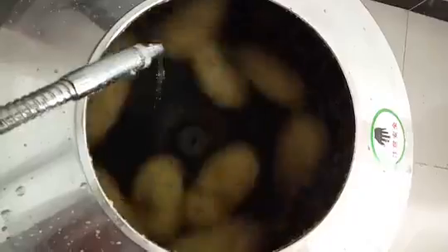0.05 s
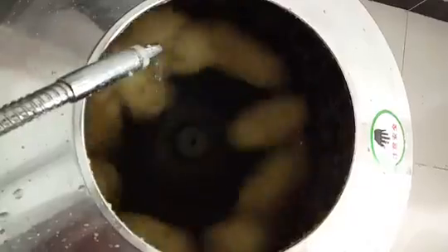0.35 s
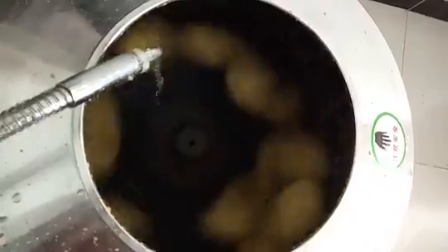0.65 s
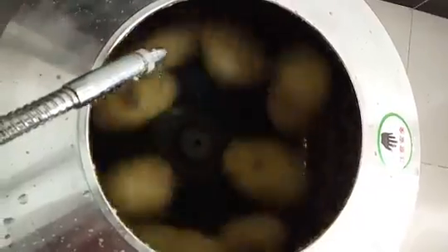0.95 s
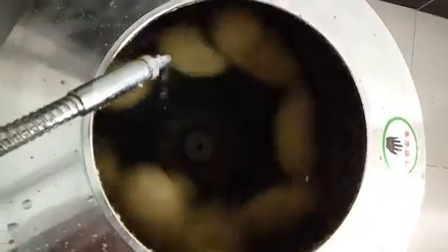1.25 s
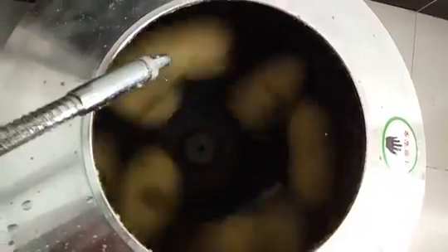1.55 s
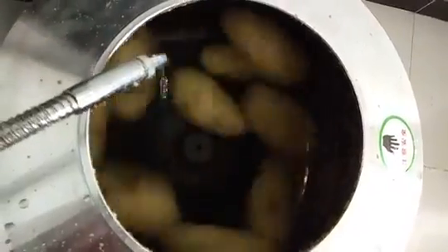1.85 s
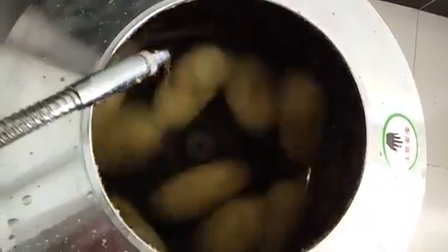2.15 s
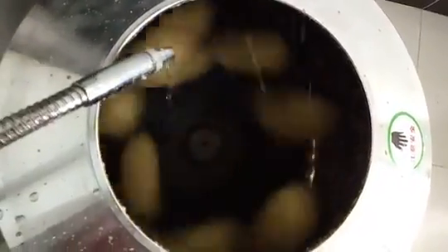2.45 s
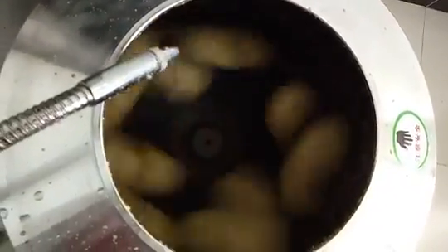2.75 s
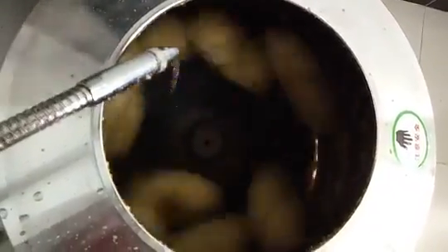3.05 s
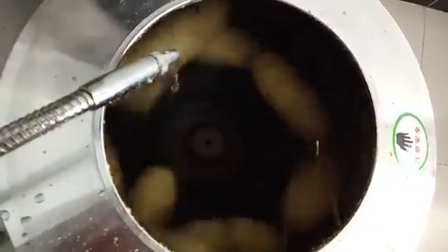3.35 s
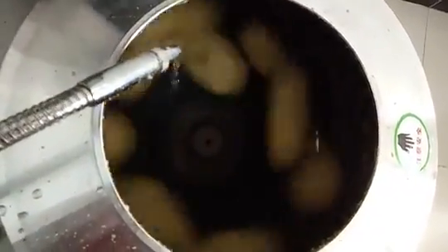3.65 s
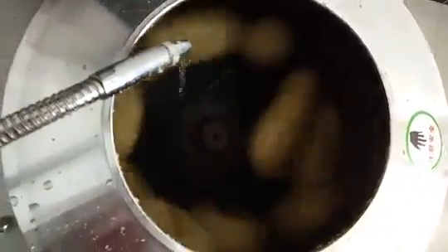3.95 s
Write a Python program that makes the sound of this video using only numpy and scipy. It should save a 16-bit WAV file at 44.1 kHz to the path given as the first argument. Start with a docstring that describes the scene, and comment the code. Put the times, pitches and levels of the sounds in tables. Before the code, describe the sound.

A potato peeling machine is heard close up from the start, running for about four seconds. Tumbling potatoes keep the steel drum booming and knock irregularly against its wall, several times a second, with brief rattles and brighter metallic glances near 0.3, 1.3, 2.5 and 3.9 seconds. Wet skins rasp on the gritty lining over a low motor hum and faint water spray. Everything is louder on the right.

```python
"""At a running potato peeling machine, a stereo microphone just above its open steel drum.
The spinning disc throws potatoes about: their soft thuds keep the drum booming, harder hits knock,
rattle and glance on the wall and rim, and the abrasive lining rasps their wet skins.
Water sprays in and the motor hums underneath. Everything is louder on the right."""
import sys
import numpy as np
from scipy import signal
from scipy.fft import rfft, irfft
from scipy.io import wavfile

SR = 44100
rng = np.random.default_rng(int(sys.argv[2]) if len(sys.argv) > 2 else 0)


def store_wav(level_fs):
    """Save 16-bit WAV to argv[1]."""
    pcm = np.round(np.clip(np.atleast_2d(level_fs), -1, 1) * 32767)
    wavfile.write(sys.argv[1], SR, pcm.T.astype(np.int16))


N = 176400
TIME, FREQ = np.arange(N) / SR, np.maximum(np.arange(N // 2 + 1) * SR / N, 1)


def from_db(db):
    """Decibels to gain."""
    return 10 ** (np.asarray(db) / 20)


def unit_rms(x):
    """Scale to rms 1."""
    return x / np.sqrt(np.mean(x ** 2) + 1e-20)


def per_hz(points):
    """Read a table along log frequency."""
    hz, value = np.transpose(points)
    return np.interp(np.log(FREQ), np.log(hz), value)


def shape(x, gain):
    """Filter by a gain per frequency."""
    return irfft(rfft(x) * gain, N)


def above(hz, order=4):
    """Gain of a high-pass."""
    return 1 / np.sqrt(1 + (hz / FREQ) ** (2 * order))


def below(hz, order):
    """Gain of a low-pass, 6 dB down at hz."""
    return 1 - above(hz, order) ** 2


def drift(rate_hz):
    """Slow random wander with rms 1."""
    return unit_rms(shape(rng.standard_normal(N), below(rate_hz, order=1)))


def clicks(per_s, spread_db):
    """Random contacts of uneven size."""
    size = from_db(spread_db * np.minimum(rng.exponential(1, N), 4))
    return (rng.random(N) < per_s / SR) * size * rng.choice([-1, 1], N)


def strikes(times, db):
    """One click per event."""
    out = np.zeros(N)
    np.add.at(out, np.clip(np.int64(times * SR), 0, N - 1), from_db(db))
    return out


def resonate(x, modes):
    """Parallel resonances (f/Hz, width/Hz, level/dB) with alternating signs."""
    out = 0
    for k, (hz, width, db) in enumerate(modes):
        r = np.exp(-np.pi * width / SR)
        ring = signal.lfilter([1, 0, -1], [1, -2 * r * np.cos(2 * np.pi * hz / SR), r * r], x + 1e-18)
        out = out + (-1) ** k * from_db(db) * (1 - r * r) / 2 * ring
    return out


def fade(x, seconds):
    """Give every click an exponential tail."""
    return signal.lfilter([1], [1, -np.exp(-1 / (seconds * SR))], x + 1e-18)


def scatter(x, seconds):
    """Reflections inside the drum smear each click, differently for each side."""
    return np.sqrt(fade(x ** 2, seconds / 2)) * rng.standard_normal((2, N))


# How alike the two sides of the microphone are: f/Hz, likeness/0-1
LIKENESS = [(25,0.97),(130,0.59),(280,0.46),(500,0.79),(750,0.33),(1200,0.11)]
def blend(pair):
    """Make two unrelated signals alike in the bass and leave them apart in the treble."""
    alike = np.sqrt(np.clip(per_hz(LIKENESS), 0, 1)) * below(880, order=2)
    mid = shape(pair[0], np.sqrt((1 + alike) / 2))
    side = shape(pair[1], np.sqrt((1 - alike) / 2))
    return mid + side * [[1], [-1]]


# Low resonances of the drum below the microphone: f/Hz, width/Hz, level/dB (relative, in all tables)
DRUM_MODES = [(107.3, 22, -5.5), (137.4, 6.7, -2), (153.5, 14.6, -6), (170.6, 18.8, -4.5), (202.2, 21, -10)]
# A heavy potato lands on the disc: t/s, level/dB
LANDINGS = [(0.093,-0.5),(0.378,2.5),(0.967,-11),(1.157,1.5),(1.301,4.5),(1.567,2),(1.61,0),(1.99,4.5),(2.147,5),(2.781,2),(3.049,0),(3.437,3.5)]
def boom():
    """Soft thuds keep the drum's low resonances ringing; a heavy landing sets them all off at once."""
    times, db = np.transpose(LANDINGS)
    softness = above(128) * below(277, order=2)
    thuds = shape(clicks(per_s=290, spread_db=.5), softness)
    landings = shape(strikes(times, db + 6.5), softness)
    ring = resonate(thuds, DRUM_MODES) + sum(resonate(landings, [mode]) for mode in DRUM_MODES)
    return from_db(-23) * unit_rms(ring)


# Motor hum from underneath: multiple of the shaft rate, level/dB
HUM_HARMONICS = [(5, -31), (6, -24.5), (7, -29)]
# Spectrum of the shaking housing: f/Hz, level/dB
HOUSING_RUMBLE = [(21,4.5),(52,-16.5),(76,-5),(160,3),(420,-4),(850,-12),(2000,-20.5)]
def motor(shaft_hz=24.12):
    """A hum on multiples of the shaft rate wavers with the load, over the rumble of the housing."""
    turns = np.cumsum(shaft_hz * (1 + 0.0122 * drift(3.83))) / SR
    hum = 0
    for multiple, db in HUM_HARMONICS:
        amplitude = np.sqrt(2) * from_db(db + 2.5 * drift(26))
        hum = hum + amplitude * np.sin(2 * np.pi * multiple * turns + .5 * drift(2.8))
    colour = from_db(per_hz(HOUSING_RUMBLE)) * above(23) * below(1640, order=4)
    rumble = shape(blend(rng.standard_normal((2, N))), colour)
    return hum + from_db(-27.5) * unit_rms(rumble)


# Spectrum of wet grit and water at close range: f/Hz, level/dB
WET_GRIT = [(1500,-2),(1950,-3.5),(2330,-1),(3150,-3),(4260,-1),(4640,2.5),(5080,.3),(5750,-9),(6200,-6.5),(7630,-18),(8800,-9),(14200,-7)]
def wet_hiss(x):
    """Give a signal the bright colour of the wet lining, at rms 1."""
    return unit_rms(shape(x, from_db(per_hz(WET_GRIT)) * above(930, order=3)))


def spray():
    """Water sprays into the drum with an even hiss."""
    return from_db(-40) * wet_hiss(rng.standard_normal((2, N)))


def spatter(q=65):
    """Droplets burst, each ringing briefly at a pitch of its own."""
    pitches = np.geomspace(2000, 13000, 24)
    drops = clicks(per_s=1600, spread_db=2) * rng.standard_normal((2, N))
    choice = rng.integers(0, len(pitches), N)
    return sum(resonate(drops * (choice == k), [(hz, hz / q, 0)]) for k, hz in enumerate(pitches))


def squeaks(width_hz=60):
    """Wet skin slips on the steel in tiny squeaks, each at a pitch of its own."""
    pitches = np.geomspace(4400, 5140, 6)
    slips = clicks(per_s=90, spread_db=4.5)
    choice = rng.integers(0, len(pitches), N)
    return sum(resonate(scatter(slips * (choice == k), seconds=.008), [(hz, width_hz, 0)])
               for k, hz in enumerate(pitches))


# For a moment the potatoes fly clear of the wall: t/s
LULLS = [0.178, 0.448, 1.185, 1.518, 1.6, 1.812, 1.879, 1.963, 2.388, 2.599, 3.05]
def wall_contact(dip_db=-4.5, half_width_s=0.016):
    """Gain of the grinding and light bumps, which sinks in each lull."""
    return from_db(dip_db * sum(np.exp(-((TIME - t) / half_width_s) ** 2) for t in LULLS))


# Continuous grinding on the lining: t/s, level/dB
GRINDING = [(0.1,-28.5),(0.6,-27.5),(0.95,-30.5),(1.06,-29),(1.24,-29.5),(1.45,-27.5),(2.3,-27),(3.02,-28.5),(3.45,-26.5),(4.0,-26)]
# A wet potato is torn along the lining: t/s, level/dB, release/s
SCRAPES = [(0.255,-33,0.025),(0.366,-23,0.032),(0.421,-19.5,0.014),(0.492,-20.5,0.041),(0.633,-27,0.035),(0.70,-19,0.022),(0.854,-18,0.012),(1.019,-21.5,0.024),(1.08,-22,0.063),(1.143,-14,0.0071),(1.416,-22,0.032),(1.48,-19,0.01),(1.545,-21.5,0.051),(1.618,-17,0.011),(1.698,-27,0.05),(1.836,-22.5,0.054),(1.93,-19.5,0.0062),(2.036,-18,0.013),(2.232,-19.5,0.0092),(2.352,-21,0.028),(2.483,-7,0.0045),(2.519,-11.5,0.01),(2.614,-21,0.072),(2.731,-21.5,0.018),(2.754,-17,0.01),(2.884,-20,0.032),(2.961,-12,0.0079),(3.099,-23.5,0.054),(3.178,-22,0.016),(3.268,-13.5,0.0065),(3.55,-45,0.014),(3.725,-25,0.012),(3.86,-19,0.019)]
def rasp(attack_s=0.0031):
    """Grit tears at the wet skins in tiny snaps, swelling whenever a potato drags or slaps the wall."""
    grinding_db = np.interp(TIME, *np.transpose(GRINDING)) - 2.5 + 1.93 * drift(20)
    power = (wall_contact() * from_db(grinding_db)) ** 2 + slap_power()
    for t, db, release_s in SCRAPES:
        age = np.clip(TIME - t, 0, 1)
        scrape = from_db(db - 3.5) * (1 - np.exp(-age / attack_s)) * np.exp(-age / release_s)
        power = power + scrape ** 2
    snaps = wet_hiss(scatter(clicks(per_s=13000, spread_db=2.5), seconds=0.0019))
    drops = from_db(-8) * wet_hiss(spatter())
    slips = from_db(-12.5) * unit_rms(squeaks())
    return np.sqrt(power) * (snaps + drops + slips)


# Resonances of the steel wall: f/Hz, width/Hz, level/dB
WALL_MODES = [(280, 142, -4), (529.7, 17.4, 3), (675.8, 59, 2), (752, 66, 1), (786, 100, -2),
              (889.3, 46, -5.5), (1114.6, 31, -11), (1203, 31, -14.5)]
# Bright resonances of the rim, close to the microphone: f/Hz, width/Hz, level/dB
RIM_MODES = [(1106, 120, 2.5), (1377, 102, 4.5), (1670, 210, -3.5), (2176, 90, 2), (2386, 80, 3.5),
             (2900, 790, -9)]
# A potato hits the wall: t/s, knock level/dB, clack level/dB
WALL_HITS = [(0.123,-20,-26.5),(0.53,-11,-29),(0.636,-17,-49),(0.707,-26,-33),(0.743,-16,-27.5),(0.804,-14,-28),(0.86,-14.5,-32),(0.929,-18.5,-25.5),(1.039,-13.5,-42),(1.144,-15.5,-35),(1.209,-14,-33),(1.232,-29,-24),(1.254,-23,-36),(1.283,-19,-38),(1.305,-15,-30),(1.398,-19,-28),(1.477,-16.5,-33),(1.544,-12,-27),(1.621,-19,-28.5),(1.652,-23,-40),(1.774,-17.5,-48),(1.912,-18.5,-32),(2.014,-16,-29),(2.244,-18.5,-50),(2.404,-14,-26.5),(2.463,-14,-27),(2.728,-22,-29),(2.814,-13,-34),(2.861,-16,-28),(2.963,-13.5,-33),(3.118,-14,-39),(3.289,-15.5,-26.5),(3.345,-20,-37),(3.406,-17,-29),(3.531,-17.5,-26.5),(3.65,-15.5,-29),(3.718,-13,-30),(3.892,-17,-33),(3.925,-15.5,-28)]
def knocks(spot_spread_db=1):
    """Hard hits ring the wall and rim and chatter briefly; the wall's ring varies with the spot hit."""
    times, knock_db, clack_db = np.transpose(WALL_HITS)
    wall_db, rim_db = knock_db + 36, clack_db + 13
    spot_db = spot_spread_db * rng.standard_normal((len(times), len(WALL_MODES)))
    ring = sum((-1) ** k * resonate(strikes(times, wall_db + spot_db[:, k]), [mode])
               for k, mode in enumerate(WALL_MODES))
    chatter = 0.046 * blend(scatter(strikes(times, wall_db), seconds=0.009))
    clacks = blend(scatter(strikes(times, rim_db), seconds=0.024))
    return ring + resonate(chatter, WALL_MODES) + resonate(clacks, RIM_MODES)


def slap_power(decay_s=0.003):
    """Wet skin slaps at each hard hit, adding a short burst of power to the rasp."""
    times, knock_db, _ = np.transpose(WALL_HITS)
    return fade(strikes(times, knock_db - 13) ** 2, decay_s / 2)


def bumps():
    """Lighter hits on the wall fill the gaps between the knocks."""
    hits = clicks(per_s=340, spread_db=2)
    reflections = .12 * blend(scatter(hits, seconds=0.001))
    return from_db(-29) * wall_contact() * unit_rms(resonate(hits + reflections, WALL_MODES))


# A potato rattles along the wall: t/s, length/s, level/dB
RATTLES = [(0.24,.12,-27.5),(0.823,0.073,-27),(2.425,0.077,-35),(2.692,0.13,-27.5),(3.066,0.094,-27.5),(3.852,0.084,-37)]
# Hollow ring of the rattled wall: f/Hz, width/Hz, level/dB
RATTLE_MODES = [(905.5, 15, 14.5), (1263, 104, -1), (2233, 87, -3.5)]
def rattles():
    """A quick run of small contacts swells and fades, ringing the wall at a hollow pitch."""
    swell = sum(from_db(db) * np.sin(np.pi * np.clip((TIME - t) / length, 0, 1))
                for t, length, db in RATTLES)
    contacts = blend(scatter(clicks(per_s=670, spread_db=1.5), seconds=0.00055))
    return swell * unit_rms(resonate(contacts, RATTLE_MODES))


# A glancing hit sets the rim singing: t/s, level/dB, f/Hz
GLANCES = [(0.314, -18, 2200), (0.4599, -24.5, 2400), (1.283, -21, 2350), (2.4555, -22, 2400),
           (3.1153, -25, 2400), (3.272, -24, 2400), (3.894, -16, 2245)]
def glances(width_hz=91):
    """Each hit skids briefly, clattering on the whole rim and favouring a pitch set by the spot."""
    out = 0
    for t, db, hz in GLANCES:
        skid = scatter(strikes(t, db + 7), seconds=0.023)
        out = out + resonate(skid, [(hz, width_hz, 10)]) + from_db(-6) * resonate(skid, RIM_MODES)
    return out


# Balance at the microphone: f/Hz, left minus right level/dB
BALANCE = [(100,-4.6),(700,-3.7),(1800,-5.5),(2400,-8),(3800,-8.5),(4750,-14),(5850,-1),(7700,-11),(8500,-2),(9400,-2),(11500,-14.5)]
def scene(left_lag_s=.0001):
    """All sources as they reach the microphone, stronger and a little earlier on the right."""
    sources = boom() + motor() + knocks() + bumps() + glances() + rattles() + rasp() + spray()
    left_gain = from_db(per_hz(BALANCE))
    left_delay = np.exp(-2j * np.pi * FREQ * left_lag_s)
    equal_power = np.sqrt(2 / (1 + left_gain ** 2))
    return shape(sources, np.array([left_gain * left_delay, np.ones_like(FREQ)]) * equal_power)


def record(dry, start_s=0.0894, rise_s=0.0055, cutoff_hz=14250):
    """The sound sets in abruptly, its peaks rounded and its highest treble cut off."""
    onset = np.clip((TIME - start_s) / rise_s, 0, 1)
    rounded = 1.29 * np.tanh(dry / 1.112)
    return signal.sosfilt(signal.ellip(12, .1, 90, cutoff_hz, fs=SR, output="sos"), rounded * onset)


dry = scene()
out = record(dry)
store_wav(out)
```